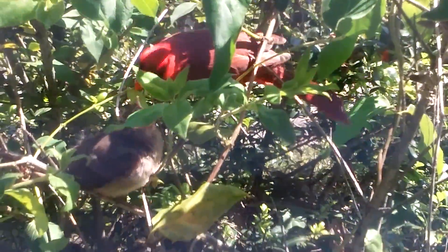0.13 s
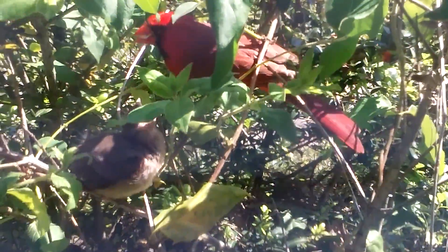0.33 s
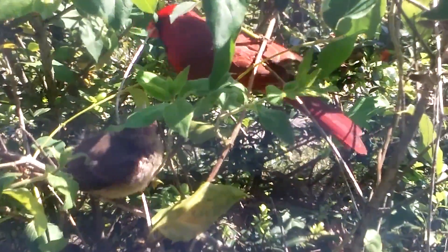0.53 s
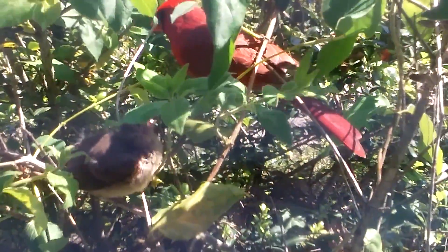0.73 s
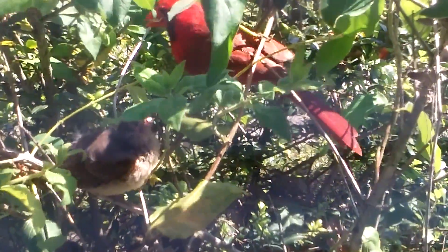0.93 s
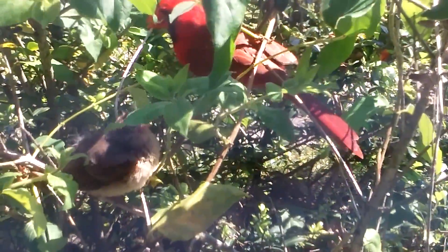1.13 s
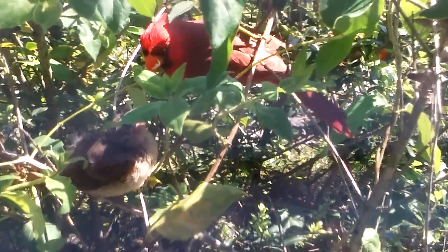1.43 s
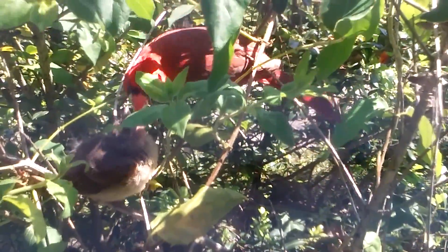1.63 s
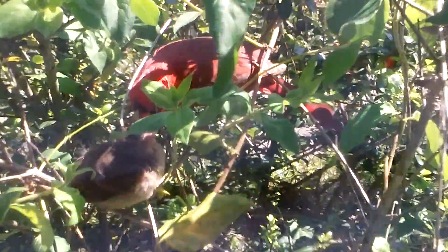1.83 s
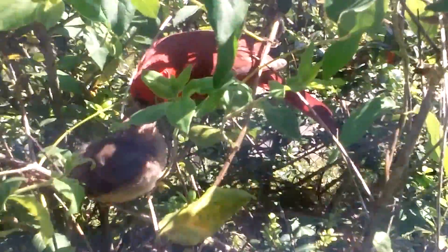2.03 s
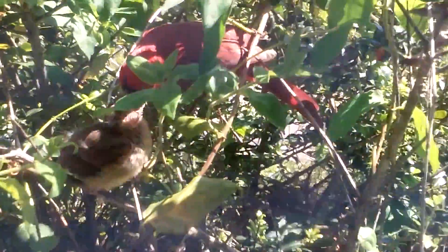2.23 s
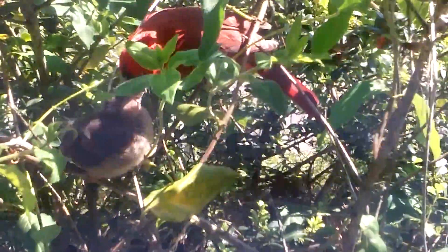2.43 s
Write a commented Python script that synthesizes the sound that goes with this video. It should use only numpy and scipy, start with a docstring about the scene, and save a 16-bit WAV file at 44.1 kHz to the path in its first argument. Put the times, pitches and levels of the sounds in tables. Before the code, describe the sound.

High raspy begging chirps of a fledgling cardinal in a bush, with late wing rustling.

```python
"""A sunny garden, one microphone close to a bush. From the start a cardinal fledgling begs in thin, buzzy
two-part calls near 7 kHz, scattered by the leaves; the first one's echo lingers. Behind lie a soft rumble,
faint low hoots and far birds. Near 1.9 s the parent leans down to feed it: wings flutter in the foliage,
and two sharp ticks follow. The last call ends at 2.4 s; wings and leaves rustle on to the end."""
import sys
import numpy as np
from scipy import signal
from scipy.fft import rfft, irfft, next_fast_len
from scipy.io import wavfile
from scipy.ndimage import map_coordinates

SR = 44100
rng = np.random.default_rng(int(sys.argv[2]) if len(sys.argv) > 2 else 0)


def digitize_waveform(pressure):
    """Quantize a signal to 16-bit integers and store it at the path in sys.argv[1].

    Rows of a 2-D input are taken as channels; values are limited to [-1, 1].
    """
    field = np.atleast_2d(pressure).T
    bounded = np.clip(field, -1, 1)
    quanta = np.round(bounded * 32767).astype(np.int16)
    wavfile.write(sys.argv[1], SR, quanta)


N = 114660


def fledgling(scoop_s=.016, drop_s=.0099, edge_s=.003, buzz_hz=982, buzz_settle_s=.03):
    """Close by: each note is a wavering whistle; a slower oscillation adds sidebands, the air a rasp."""
    # begging notes: t/s, length/s, mid-note f/Hz, onset offset/Hz, climb/(Hz/s), final drop/Hz,
    # level/dB, attack/s, release/s, then base levels re the tone: upper sideband/dB, rasp/dB, octave/dB
    notes = [ (-.06, 0.083, 7376, -7, -2, 603, -28.5, .02, 0.0073, -9.5, -20.5, -36),
             (.121, 0.21, 6996, 764, 2293, 340, -21, 0.052, 0.075, -12.5, -32, -50),
             (0.297, .062, 7050, 3, 3514, 105, -38, .01, 0.019, -4.5, -23, -41),
             (0.501, 0.15, 7100, 1101, 1790, 542, -30.5, 0.096, .04, -1.5, -20, -37),
             (0.648, .090, 7425, -900, -2500, 691, -28, 0.059, .035, -4, -28.5, -37),
             (0.903, 0.14, 7147, 1175, 507, 309, -29, 0.077, 0.013, -6, -24, -39.5),
             (1.064, 0.083, 7344, -200, -2500, 607, -29, 0.037, 0.032, -3, -24.5, -37.5),
             (1.26, 0.13, 7190, 915.5, 7, 402, -27.5, 0.077, 0.044, -4.5, -22.5, -38),
             (1.39, .082, 7440, -500, -1000, 562, -28.5, 0.035, 0.034, -3, -26, -35),
             (1.562, 0.13, 7310, 737, 902, 438, -29, .06, 0.032, -4.5, -22.5, -28.5),
             (1.699, 0.092, 7440, -600, 809.5, 605.5, -32.5, .035, .025, -4, -22, -28.5),
             (1.889, 0.14, 7290, 266, 1480.5, 422, -20.5, 0.087, 0.036, -9.5, -20, -32.5),
             (2.006, 0.11, 7400, -350, -500, 808.5, -27, 0.024, 0.012, -11.5, -29.5, -37.5),
             (2.231, 0.086, 6567, 907, 11003, -7, -24, 0.08, 0.016, -18, -30, -46),
             (2.314, 0.1, 7055, 67.5, 2211, 600, -16, 0.0061, 0.068, -15, -36.5, -44.5)]
    # spectrum of the rasp: f/Hz, level/dB
    rasp_spectrum = [(2500, -20), (4200, -12), (5600, -13.5), (6600, -18), (7700, 2.5), (9000, 11),
                     (9900, -8), (11500, -5.5), (13500, -15), (15000, -29), (16000, -10)]
    out, now = np.zeros(N), clock()
    waver = 75 * wobble(140) + 55 * wobble(800)
    buzz_waver = 60 * wobble(140)
    flicker, side_flicker = amp(2.5 * wobble(210)), amp(1.1 * wobble(90))
    rasp = noise(rasp_spectrum)
    scatter_hz = 400 * wobble(1500)
    for start, length, hz, offset, climb, drop, db, attack, release, side_db, rasp_db, octave_db in notes:
        i = (now >= start) & (now < start + length)
        t = now[i] - start
        left, from_middle = length - t, t - length / 2
        unsettled = np.exp(-t / scoop_s)
        unrest = np.sqrt(.36 + amp(side_db))  # the buzzier a note, the more it wavers
        pitch = hz + offset * unsettled + climb * from_middle - drop * np.exp(-left / drop_s)
        tone = phase(pitch + unrest * waver[i])
        hurry = .41 * max(offset, 0) * np.exp(-(t / buzz_settle_s) ** 2)  # a high onset buzzes faster
        buzz = phase(buzz_hz + hurry + unrest * buzz_waver[i])
        second = amp(-17.5 - 75 * unsettled) * np.sin(tone + 2 * buzz)
        upper = amp(side_db - 10 * unsettled) * side_flicker[i] * (np.sin(tone + buzz) + second)
        lower = amp(-29) * np.sin(tone - buzz)
        octave = amp(octave_db) * (np.sin(2 * tone) + np.sin(2 * tone + buzz))
        voice = flicker[i] ** unrest * (np.sin(tone) + upper + lower + octave)
        scrape_hz = 4100 + 2878 * np.exp(-t / .04) + scatter_hz[i]  # a rough band falls from the onset
        scrape = amp(-5.5) * np.exp(-t / .055) * np.sin(phase(scrape_hz))
        breath = amp(rasp_db + 9.1 * np.exp(-t / .037) - 26 * from_middle) * (rasp[i] + scrape)
        swell_db = 16.5 * np.clip(1 - t / attack, 0, 1) ** 2
        fade_db = 22.5 * np.clip(1 - left / release, 0, 1) ** 2
        gate = np.clip(np.minimum(t, left) / edge_s, 0, 1)
        out[i] += gate * amp(db - swell_db - fade_db) * (np.sqrt(2) * voice + breath)
    return out


def ticks(glide_s=.000775, peak_s=.00053, ring_hz=4020, ring_t60=.031, crack_t60=.01):
    """Two snaps of bill or twig in the bush: a very fast downward chirp, a crack and a short ring."""
    # snaps: t/s, chirp peak/dB, first f/Hz, last f/Hz, ring re chirp/dB
    snaps = [(1.9667, -5, 9500, 2900, -17), (2.0359, -8.5, 7200, 5200, -22)]
    # spectrum of the crack: f/Hz, level/dB
    crack_spectrum = [(700, -46), (1200, -30), (1700, -4.5), (3500, -1.5), (7000, 9), (11000, -6),
                      (16000, -24)]
    tonal, burst = np.zeros(N), np.zeros(N)
    for start, db, first_hz, last_hz, ring_db in snaps:
        t = np.maximum(clock() - start, 0)
        rise = t / peak_s
        pitch = last_hz + (first_hz - last_hz) * np.exp(-t / glide_s)
        chirp = rise * np.exp(1 - rise) * np.sin(phase(pitch * (t > 0)))
        ring = amp(ring_db - 60 * t / ring_t60) * (1 - np.exp(-rise)) * np.sin(2 * np.pi * ring_hz * t)
        tonal += amp(db) * (chirp + ring)
        burst += (t > 0) * amp(db - 6 - 60 * t / crack_t60)
    return tonal + coloured(burst * rng.standard_normal(N), crack_spectrum)


def wings(crackle_t60=.0074):
    """The parent's feathers quiver against near leaves; a few fuller strokes scuff and twigs crackle."""
    # course of the flutter: t/s, level/dB
    flutter = [(1.89, -58.5), (1.929, -52.5), (2.0, -47.5), (2.08, -48), (2.151, -41.5), (2.21, -43.5),
               (2.27, -42.5), (2.308, -47), (2.368, -38), (2.419, -50), (2.46, -44), (2.541, -55),
               (2.6, -46.5)]
    # spectrum of leaves and twigs: f/Hz, level/dB
    leaf_spectrum = [(30, -55), (300, -1), (1100, -13.5), (1700, -3), (3000, -3), (5000, -3), (6700, 0),
                     (8000, -20), (11000, -19), (16000, -45)]
    # wing strokes: t/s, half width/s, level/dB
    scuffs = [(2.279, 0.013, -44), (2.363, 0.01, -37.5), (2.412, 0.027, -48.5)]
    # spectrum of a stroke: f/Hz, level/dB
    scuff_spectrum = [(30, -45), (100, -24), (220, 6), (600, -1), (1400, -2), (2200, -7.5), (3100, -2.5),
                      (5000, -36), (10000, -35)]
    # twig crackles: t/s, level/dB
    crackles = [(2.225, -34), (2.343, -25), (2.363, -25.5), (2.449, -29.5)]
    now = clock()
    times, levels = np.transpose(flutter)
    quiver = (now > times[0]) * amp(np.interp(now, times, levels) + 1.5 * wobble(50))
    rustle = unit(amp(.5 * wobble(900)) * noise(leaf_spectrum))
    strokes = sum(amp(db) * np.exp(-.5 * ((now - at) / width) ** 2) for at, width, db in scuffs)
    feathers = unit(amp(1.9 * wobble(300)) * noise(scuff_spectrum))
    twigs = sum((now > at) * amp(db - 60 * np.abs(now - at) / crackle_t60) for at, db in crackles)
    return quiver * rustle + strokes * feathers + twigs * noise(leaf_spectrum)


def hoots():
    """Faint low hooting tones from behind the bush."""
    # hoots: t/s, length/s, first f/Hz, last f/Hz, level/dB
    tones = [(-.03, 0.15, 273, 347, -50.5), (.08, 0.11, 371.5, 385, -54), (.21, 0.092, 316.5, 255, -54.5),
             (.62, .11, 281, 336.4, -52), (.66, 0.13, 371, 400, -54.5), (.94, 0.27, 329.4, 347, -51),
             (.99, 0.172, 666, 603, -55), (1.33, .12, 375, 375, -55.5), (2.02, 0.13, 411, 457, -53),
             (2.57, 0.084, 292, 290, -41.5)]
    return glides(tones, waver=.033, flicker_db=3.5)


def far_whistles():
    """Blurred by the trees: the lingering 7.5 kHz echo of the fledgling's previous call, and far birds."""
    # call echo (the row at 0 s) and bird whistles: t/s, length/s, first f/Hz, last f/Hz, level/dB
    whistles = [(-.03, .15, 3213, 2884, -64.5), (-.03, 0.31, 3540, 3210, -73), (.0, 0.23, 7600, 7430, -62),
                (.10, 0.083, 2710, 2650, -66), (.97, 0.076, 2920, 2960, -67.5),
                (1.565, 0.0373, 5220, 5580, -54), (1.66, 0.18, 2323, 2070, -67.5),
                (1.78, 0.062, 2845, 3170, -72), (1.825, 0.017, 4300, 4050, -58)]
    return echo(glides(whistles, waver=.045, flicker_db=1.5), t60=.3)


def outdoor_air(rumble_db=-53.5, hiss_db=-66.5):
    """All around the microphone: a soft, slightly wavering rumble and a thin hiss."""
    # spectra of the rumble and the hiss: f/Hz, level/dB
    rumble_spectrum = [(20, -48), (35, -42), (55, -11.5), (100, -5), (200, -3), (320, -3), (450, -5),
                       (600, -2), (770, -12), (920, -3.5), (1130, -18), (1330, -10), (1550, -17.5),
                       (2200, -20.5), (3000, -29.5), (4000, -36), (6000, -57)]
    hiss_spectrum = [(1500, -5), (3500, -9), (5200, -1), (7000, 9), (10000, -4), (13000, 1), (16000, -0.5)]
    rumble = amp(rumble_db + .3 * wobble(3.2)) * noise(rumble_spectrum)
    return rumble + amp(hiss_db) * noise(hiss_spectrum)


def glides(rows, waver, flicker_db):
    """Soft gliding tones, unsteady in pitch and level."""
    out, now = np.zeros(N), clock()
    drift, flicker = 1 + waver * wobble(60), amp(flicker_db * wobble(45.29))
    for start, length, first_hz, last_hz, db in rows:
        i = (now >= start) & (now < start + length)
        progress = (now[i] - start) / length
        pitch = (first_hz + (last_hz - first_hz) * progress) * drift[i]
        arch = np.sqrt(2 * np.abs(np.sin(np.pi * progress)))
        out[i] += amp(db) * arch * np.sin(phase(pitch))
    return out * flicker


def echo(x, t60):
    """Diffuse reflections of x: a dying tail of unit energy."""
    t = np.arange(SR // 2) / SR
    tail = rng.standard_normal(len(t)) * amp(-60 * t / t60) * (t > .001)
    return signal.fftconvolve(x, tail / np.linalg.norm(tail))[:N]


def amp(db):
    """Decibels to gain."""
    return 10 ** (np.asarray(db) / 20)


def unit(x):
    """Scale to rms 1."""
    return x / np.sqrt(np.mean(x ** 2) + 1e-20)


def clock():
    """Time of each sample."""
    return np.arange(N) / SR


def phase(hz):
    """Running phase of a frequency curve."""
    return 2 * np.pi * np.cumsum(hz) / SR


def wobble(rate):
    """A smooth random curve, rate knots a second."""
    return map_coordinates(rng.standard_normal(4096), [clock() * rate], mode="mirror")


def filtered(x, response):
    """x through a frequency response."""
    size = next_fast_len(N + SR // 4)
    return irfft(rfft(x, size) * response(np.fft.rfftfreq(size, 1 / SR)), size)[:N]


def coloured(x, spectrum):
    """x shaped by points of f/Hz, level/dB."""
    f, db = np.transpose(spectrum)
    return filtered(x, lambda hz: amp(np.interp(np.log(hz + 1), np.log(f), db)))


def noise(spectrum):
    """Coloured noise of rms 1."""
    return unit(coloured(rng.standard_normal(N), spectrum))


def scene(leaf_echo_db=-8, garden_echo_db=-22):
    """The birds among near leaves, whose quick echoes make the calls ragged, in an open garden."""
    calls = fledgling()
    ragged_calls = np.std(calls) * unit(calls + amp(leaf_echo_db) * echo(calls, t60=.018))
    bush = ragged_calls + ticks() + wings()
    garden = amp(garden_echo_db) * echo(bush, t60=.36)
    return (bush + garden + outdoor_air() + far_whistles() + hoots())[None]


def record(dry, top_hz=15830):
    """One microphone, with nothing kept above the band limit."""
    return filtered(dry[0], lambda hz: hz < top_hz)[None]


dry = scene()
out = record(dry)
digitize_waveform(out)
```